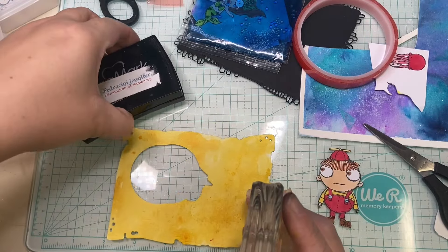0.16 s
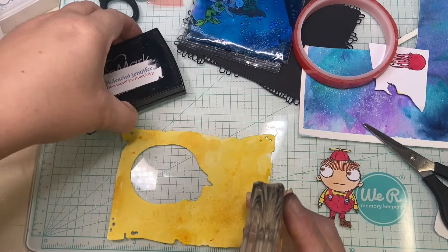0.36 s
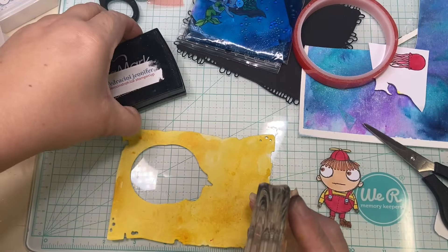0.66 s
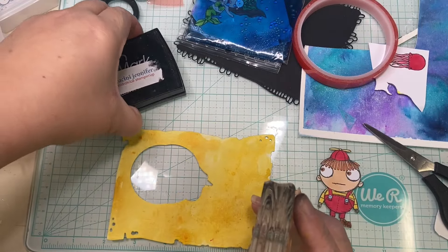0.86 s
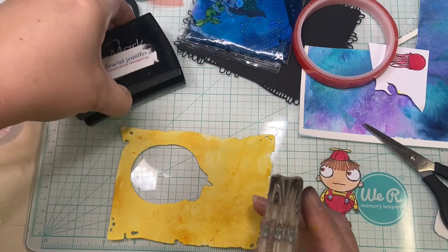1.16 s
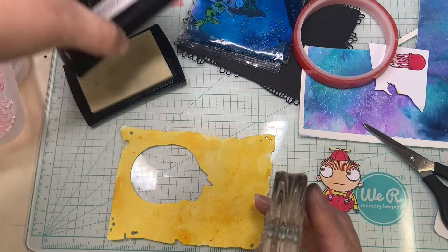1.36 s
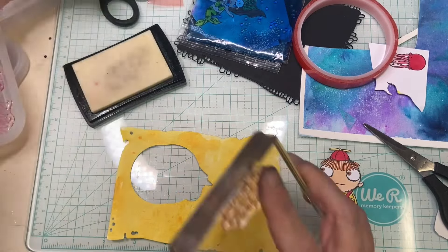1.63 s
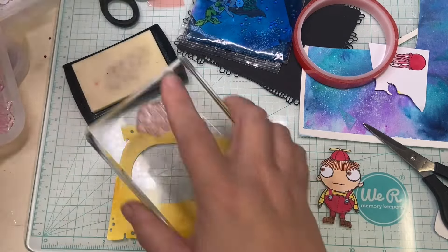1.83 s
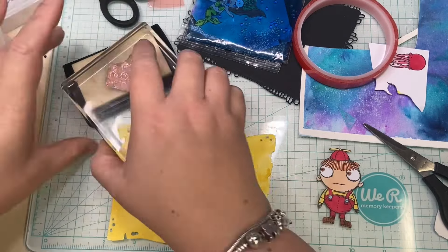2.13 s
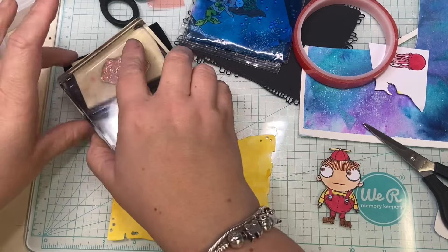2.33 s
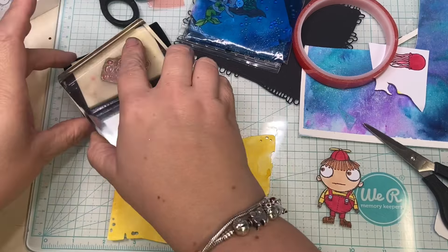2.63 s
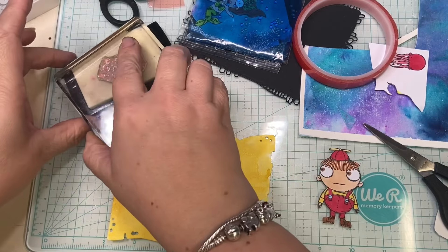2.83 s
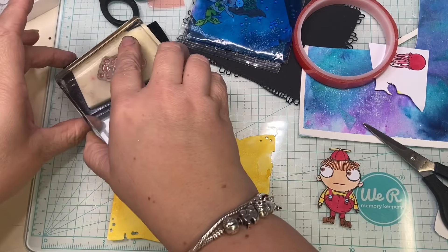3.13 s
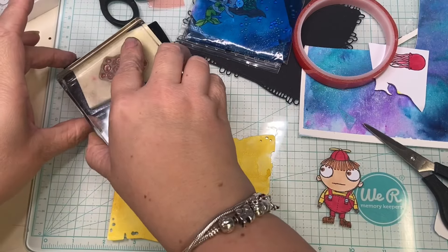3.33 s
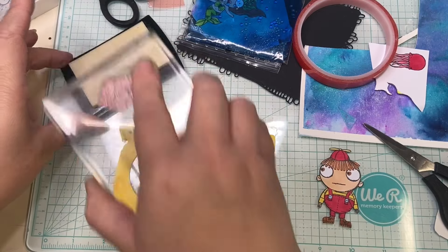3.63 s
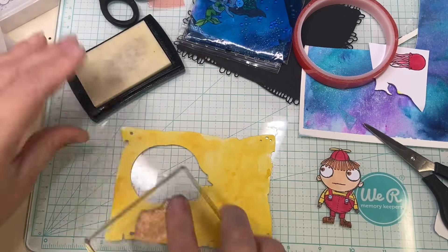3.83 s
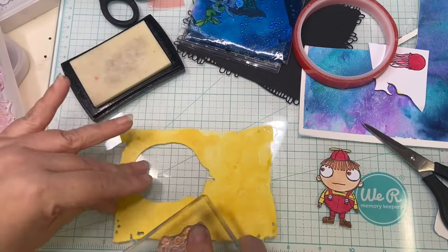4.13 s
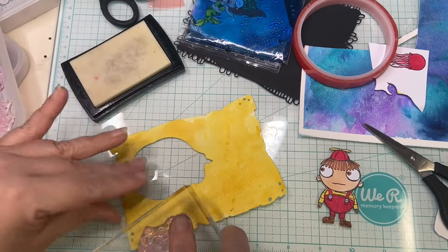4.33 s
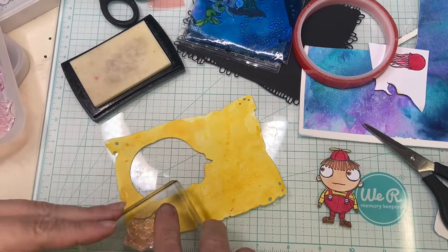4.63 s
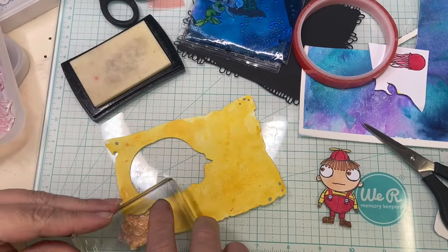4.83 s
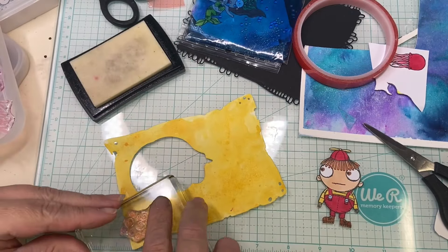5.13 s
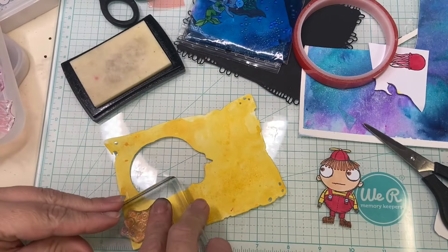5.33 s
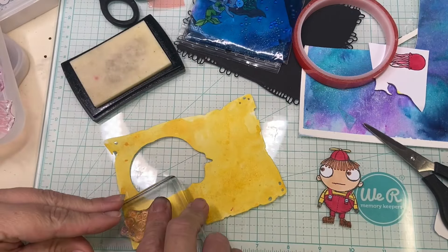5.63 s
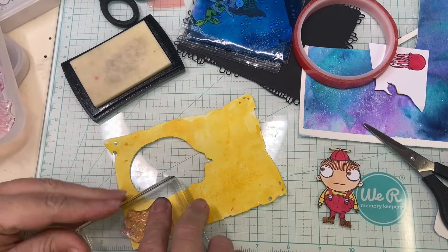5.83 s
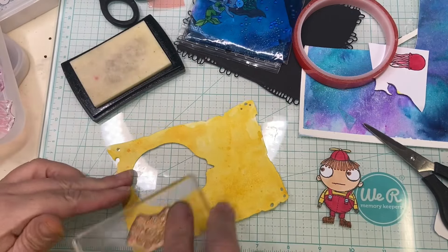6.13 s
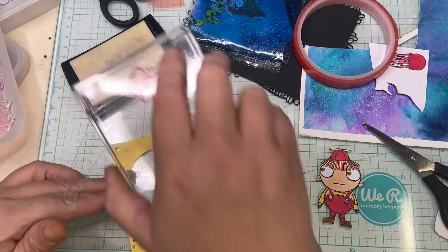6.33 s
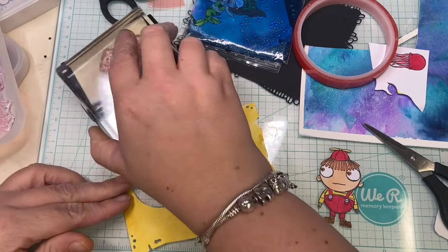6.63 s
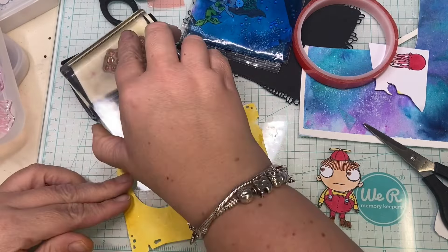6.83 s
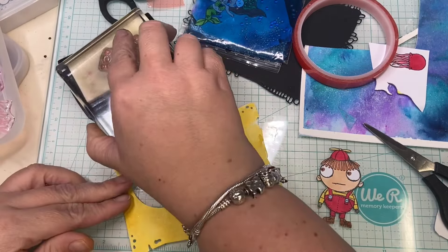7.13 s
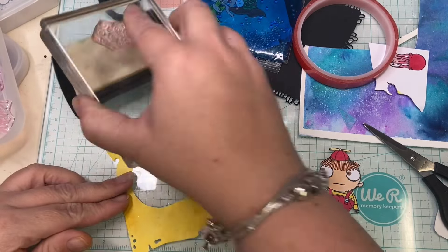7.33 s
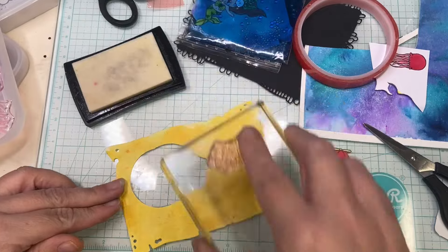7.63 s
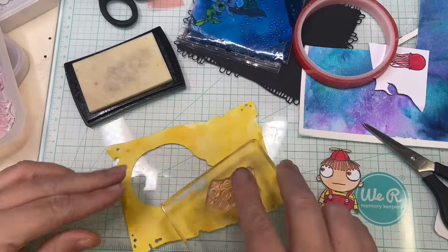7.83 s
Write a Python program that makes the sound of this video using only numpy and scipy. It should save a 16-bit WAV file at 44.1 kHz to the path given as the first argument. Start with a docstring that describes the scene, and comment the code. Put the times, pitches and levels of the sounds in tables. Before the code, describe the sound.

On a craft table in a quiet room, a plastic ink pad lid is pulled off with a few sharp clacks and clatters down. An acrylic stamp block knocks against the pad's case, presses onto card with soft, low thuds and peels away with a sticky snap. More bright clacks follow near the end. Hands and card rustle faintly, close to the microphone, over a soft ventilation hum.

```python
"""A craft table in a quiet room: someone is stamping, close to the microphone.
The lid of an ink pad is pulled off and clatters down; an acrylic block clacks on the pad's plastic case,
is pressed on card and peels off stickily. Each clack layers ringing modes, a noisy crack and a click.
The table top thuds under knocks and hands, skin and card rub in fine grains, and tacky rubber ticks
and rasps. A short room tail surrounds the bright sounds; a soft ventilation hum lies below."""
import sys
import numpy as np
from scipy import signal
from scipy.io import wavfile

SR = 44100
rng = np.random.default_rng(int(sys.argv[2]) if len(sys.argv) > 2 else 0)


def output_pcm(signal):
    """Save a mono or channel-first signal as 16-bit PCM at the path in sys.argv[1].

    Samples are clipped to [-1, 1] before scaling.
    """
    pcm = np.clip(np.atleast_2d(signal).T, -1, 1) * 32767
    wavfile.write(sys.argv[1], SR, np.round(pcm).astype(np.int16))


N = 351918

# block and fingers knock on the pad case; above its hardness a blow loses treble:
# t/s, level/dB, hardness/Hz, place (0 = top, 1 = rim), push into the table/dB relative to level
CASE_KNOCKS = [(0.1105, -28.5, 3160, 0.22, -18), (0.3045, -36.5, 2860, 0.31, -15),
               (1.0385, -25, 940, 0.12, -1.5), (1.1825, -15, 11000, 0.18, -6.5),
               (1.2382, -21, 18000, 0.25, -3.5), (1.2722, -24.5, 10700, 0.19, -10),
               (1.2922, -22, 7600, .2, -11), (2.7042, -24.5, 12000, 0.053, -6),
               (3.5026, -15, 17960, 0.19, -4.5), (3.5135, -25, 13000, 0.25, -3),
               (4.9925, -53, 3500, 0.22, 6), (5.222, -56, 1605, .1, 10.5), (5.9426, -48, 4000, 0.23, 0),
               (6.9416, -46.5, 2420, 0.35, -14), (7.0673, -19.5, 10000, 0.13, -13.5),
               (7.3835, -15, 7900, 0.76, -20), (7.394, -14.5, 11900, 0.72, -17),
               (7.425, -29, 5940, 0.72, -12), (7.441, -27.5, 15000, 0.57, -16),
               (7.447, -25.5, 18000, 0.51, -20)]
# modes of the case: f/Hz, level struck on top/dB, level struck at the rim/dB, t60 before damping/s
CASE_MODES = [(785, -5, -12, .07), (1000, -4, -18, .04), (1132, 2, -14, .06), (1510, 0, -6, .045),
              (1610, 4, -1, .045), (1740, -2, -5, .04), (1860, -3, -3, .045), (2020, -10, -3, .045),
              (2730, -4, -4, .055), (2865, -9, 0, .065), (3160, -7, -6, .06), (3760, -6, -3, .04),
              (3950, 0, 0, .045), (4080, -9, -3, .035), (5200, -7, -5, .04), (5470, -5, -8, .04),
              (8480, -8, -12, .04), (9600, -8, -14, .04), (9950, -7, -11, .04)]
# tone of a perfectly hard blow on the case, a row per band: on top/dB, at the rim/dB
CASE_BAND_GAINS = [(2, -15.5), (0.07, -3.5), (-1.4, 2.5), (-4, -5)]
# the lid lands, bounces and settles: t/s, level/dB, hardness/Hz, place (0 = corner, 1 = flat)
LID_BOUNCES = [(1.639, -46.5, 2100, 0.61), (1.6901, -16, 18000, 0), (1.7048, -23, 6500, 0.17),
               (1.7404, -26, 5200, 0.2), (1.7652, -31, 3000, 0.8), (1.7834, -16, 13000, 1),
               (1.8038, -19, 11000, 0.81), (1.83, -25.5, 5800, 0.78), (1.8639, -25.5, 6200, 1),
               (1.872, -27, 8300, 0.59), (1.904, -30, 5800, 0.65), (1.978, -35.5, 3700, 0.56)]
# modes of the lid: f/Hz, level struck on a corner/dB, level struck flat/dB, t60 before damping/s
LID_MODES = [(790, -11, -12, .09), (1136, -6, -9, .1), (1650, -11, -8, .06), (1990, -5, -7, .06),
             (2450, -8, -11, .07), (2860, -4, -9, .08), (3150, -9, -3, .085), (3377, -9, 0, .1),
             (3735, 4, -10, .06), (3957, -12, -9, .08), (4748, -14, -10, .08), (5047, -16, -4, .085),
             (5232, 0, -14, .065), (5728, -7, -1, .08), (6007, -7, -4, .06), (6245, -8, -4, .07),
             (8533, -14, -9, .06), (9152, -14, -3, .05), (9606, -4, -14, .06), (9980, -5, -15, .06),
             (11400, -5, -16, .05)]
# tone of a perfectly hard blow on the lid, a row per band: on a corner/dB, flat/dB
LID_BAND_GAINS = [(-6.5, -9.5), (-4, -3.5), (4, 4.5), (-2, -1.5)]
# low, middle, high and treble bands of a hit: lower f/Hz, upper f/Hz
TONE_BANDS = [(550, 1300), (1300, 2400), (2400, 6500), (8000, 16000)]
# spectrum of the crowd of short-lived plastic modes: f/Hz, gain/dB
CRACK_EQ = [(100, -18.5), (250, -11.5), (550, -8), (800, -1.5), (1150, -6.5), (1700, 0), (2300, -3),
            (3900, -5), (4600, -6), (5600, -6), (6800, -8.5), (10000, -7.5), (12500, -12), (16000, -17.5)]
# spectrum of a small sharp tick: f/Hz, gain/dB
TICK_EQ = [(300, -35), (1800, -3), (4000, -5.5), (5800, -1.5), (11000, -0.5), (16000, -11)]
# accent ticks of the tacky stamp on pad and card: t/s, peak/dB
STAMP_TICKS = [(2.059, -38), (2.08, -34), (5.127, -50), (5.8633, -30.5), (5.9299, -34), (5.9423, -26),
               (5.9802, -21.5), (5.9842, -15.5), (7.7569, -35.5)]
# light handling ticks: rate/(1/s), least peak above the stroke's level/dB, spread/dB
HANDLING_TICKS = (7, 18.8, 2.2)
# the stamp peels off the card: start/s, end/s, final level/dB
STAMP_PEEL = (5.94, 5.982, -46)
# modes of the table top: f/Hz, relative level/dB, t60/s
TABLE_MODES = [(65.94, 0, 0.16), (89.63, -0.5, 0.056), (118, -2.5, .08), (165, -3, .07), (205, -3.5, 0.12),
               (282, 1, .05), (434, 2.5, 0.12)]
# hands lean on the table or let go of it: t/s, peak/dB
HAND_PRESSES = [(2.266, -37), (5.135, -33), (5.177, -41.5), (5.956, -34.5), (6.667, -32), (6.719, -39)]
# the hands open the pad, ink the block, turn the card and stamp: start/s, length/s, level/dB
HAND_STROKES = [(0.999, .75, -72), (1.949, 0.45, -66), (2.55, .25, -68), (3.03, 0.32, -77),
                (3.399, 0.57, -68.5), (3.948, 0.36, -74.5), (4.299, .38, -75.5), (5.749, 0.96, -71),
                (6.87, 0.22, -73), (7.2, 0.76, -71)]
# the uneven pace of a hand: rate/(1/s), depth/dB
HAND_WAVER = (14, 2)
# spectrum of rubbing skin and card: f/Hz, gain/dB
RUB_EQ = [(300, -16), (2000, -1.5), (5500, 5.5), (8500, -2), (12000, 4.5), (15500, -0.5)]
# ring time of the room: f/Hz, t60/s
ROOM_DECAY = [(150, 0.6), (600, 0.13), (2500, 0.16), (6000, .15), (14000, 0.095)]
# spectrum of the room's hum and hiss: f/Hz, gain/dB
HUM_EQ = [(20, -39.5), (45, -13.5), (67, 5), (88, -5.5), (170, -10), (270, -1), (380, -3.5), (600, -9),
          (900, -19), (2400, -25), (4800, -33.5), (7000, -48), (10000, -49), (16000, -60)]
# resonances and hollows of the room that colour the hum: f/Hz, width/Hz, gain/dB
HUM_BELLS = [(328, 12, -8.5), (360, 19, 3.5), (450, 20, -9.5), (525, 33, 3.5), (657, 11, -8.5),
             (1016, 71, -10), (1070, 58, 8)]
# level curve of the hum: t/s, level/dB
HUM_LEVELS = [(0, -48), (0.699, -49), (3.302, -48.5), (3.8, -51), (5.3, -49.5), (6.9, -49), (7.4, -47),
              (7.55, -50.5), (7.98, -48.5)]
# notches of the microphone port: f/Hz, width/Hz, depth/dB
PORT_NOTCHES = [(7335, 470, 19), (13360, 550, 14.5)]


def case_clacks():
    """Block and fingers strike the pad case; the holding hand keeps its ring short."""
    return plastic_hits(CASE_KNOCKS, CASE_MODES, CASE_BAND_GAINS, ring_share=.4, detune=.012,
                        click_db=-14, click_t60=.0047, punch_db=-2, punch_s=.0038,
                        rise_s=.0015, damping_db_per_s=250)


def lid_clatter():
    """The loose lid bounces on its corners and face, ringing more freely than the case."""
    return plastic_hits(LID_BOUNCES, LID_MODES, LID_BAND_GAINS, ring_share=.45, detune=.005,
                        click_db=-7, click_t60=.012, punch_db=-7.5, punch_s=.003,
                        rise_s=.0027, damping_db_per_s=100)


def plastic_hits(hits, modes, band_gains, ring_share, detune, click_db, click_t60,
                 punch_db, punch_s, rise_s, damping_db_per_s):
    """Each blow rings the plastic; the place and hardness of the contact set its colour."""
    choke_db, choke_s, soft_slope = 9, .006, 3.6
    out, t = np.zeros(N), np.arange(SR // 4) / SR
    gaps = np.diff([hit[0] for hit in hits], append=N / SR)
    centres = np.sqrt(np.prod(TONE_BANDS, axis=1))
    for (start, level_db, hard_hz, place, *_), gap in zip(hits, gaps):
        ring = np.zeros(len(t))
        for (hz, first_db, second_db, t60), (phase, load) in zip(modes, rng.uniform(-1, 1, (len(modes), 2))):
            mode_db = first_db + (second_db - first_db) * place
            # whatever holds the plastic damps each mode and pulls it a little off pitch
            decay = amp(mode_db - (60 / t60 + damping_db_per_s) * t)
            ring += decay * np.sin(2 * np.pi * (hz * (1 + detune * load) * t + phase))
        choke = amp(-choke_db * np.clip((t - gap) / choke_s, 0, 1))  # the next contact damps the ring
        ring = unit_rms(ring) * choke
        crack = unit_rms(eq(burst(t, t60=.046), CRACK_EQ))
        click = unit_rms(eq(burst(t, click_t60), TICK_EQ))  # the hard edges meet
        hit = np.sqrt(ring_share) * ring + np.sqrt(1 - ring_share) * crack + amp(click_db) * click
        hit *= 1 + amp(punch_db) * np.exp(-(t / punch_s) ** 2)  # loudest while the two parts touch
        hit *= 1 - np.exp(-t / rise_s)  # the contact force takes a moment to build
        dulling_db = 10 * np.log10(1 + (centres / hard_hz) ** soft_slope)  # soft contacts last longer
        targets_db = level_db + np.dot(band_gains, [1 - place, place]) - dulling_db
        for _ in range(2):  # the bands overlap, so the tone is set in two passes
            trims_db = targets_db - [attack_db(hit, band) for band in TONE_BANDS]
            hit = eq(hit, list(zip(centres, trims_db)))
        add(out, start, hit)
    return out


def tacky_ticks():
    """Tacky rubber lets go in tiny bright snaps; faint ones fall at random within the hand strokes."""
    out, t = np.zeros(N), np.arange(SR // 10) / SR
    per_s, above_db, spread_db = HANDLING_TICKS
    strays, tries = [], 16
    for start, length, db in HAND_STROKES:
        for when, size, chance in rng.random((tries, 3)):
            if chance < per_s * length / tries:
                strays.append((start + length * when, db + above_db - spread_db * np.log(1 - size)))
    for start, peak_db in STAMP_TICKS + strays:
        tick = eq(burst(t, t60=.022, snap=.41), TICK_EQ)
        add(out, start, amp(peak_db) * tick / abs(tick).max())
    return out


def peel(growth_db):
    """Inky rubber tears free of the card in a rasp that grows until it lets go."""
    start, end, final_db = STAMP_PEEL
    out, size = np.zeros(N), round((end - start) * SR)
    rasp = unit_rms(eq(grains(size), TICK_EQ))
    add(out, start, rasp * amp(final_db + np.linspace(-growth_db, 0, size)))
    return out


def table_thuds(rise_s, lag_s, low_cut_hz, db_per_octave):
    """Knocks and presses swing the table top under the mat; a quicker push favours higher modes."""
    quick_hz, slow_hz, lid_push_db = 97.1, 78.97, -19.5
    out, t = np.zeros(N), np.arange(SR // 2) / SR
    low_cut = signal.butter(5, low_cut_hz, "high", fs=SR, output="sos")
    pushes = ([(start, db + push_db, quick_hz) for start, db, _, _, push_db in CASE_KNOCKS]
              + [(start, db + lid_push_db, slow_hz) for start, db, _, _ in LID_BOUNCES]
              + [(start, db, slow_hz) for start, db in HAND_PRESSES])
    for start, peak_db, push_hz in pushes:
        thud = np.zeros(len(t))
        for hz, db, t60 in TABLE_MODES:
            mode_db = db - db_per_octave * abs(np.log2(hz / push_hz))
            thud += amp(mode_db - 60 * t / t60) * np.sin(2 * np.pi * hz * (t - rise_s))
        thud *= 1 - np.exp(-(t / rise_s) ** 2)
        thud = signal.sosfilt(low_cut, thud)
        add(out, start + lag_s, amp(peak_db) * thud / abs(thud).max())
    return out


def hand_rustle(fade_s):
    """Skin and card rub in fine grains; each stroke swells, wavers with the hand's pace and fades."""
    t = np.arange(N) / SR
    envelope = sum(amp(db) * np.clip(np.minimum(t - start, start + length - t) / fade_s, 0, 1)
                   for start, length, db in HAND_STROKES)
    per_s, depth_db = HAND_WAVER
    pace = np.interp(t * per_s, np.arange(N), rng.standard_normal(N))
    return envelope * amp(depth_db * pace) * unit_rms(eq(grains(N), RUB_EQ))


def room(x, wet_db, build_s):
    """Early echoes from the table and walls merge into a short tail behind the direct sound."""
    hz, t, noise = signal.stft(rng.standard_normal(SR // 2), SR, nperseg=256)
    decay = amp(-60 * t / curve_at(ROOM_DECAY, hz)[:, None])
    tail = signal.istft(noise * decay, SR, nperseg=256)[1]
    tail *= 1 - np.exp(-(np.arange(len(tail)) / SR / build_s) ** 2)
    return x + amp(wet_db) * signal.fftconvolve(x, tail / np.linalg.norm(tail))[:N]


def ventilation_hum(waver_db):
    """A bed of low ventilation noise, coloured by the room and wavering a little."""
    air = colour(rng.standard_normal(N), lambda hz: curve_at(HUM_EQ, hz) + bells(HUM_BELLS, hz), 8192)
    waver = np.interp(np.arange(N), np.linspace(0, N, 60), rng.standard_normal(60))
    level_db = np.interp(np.arange(N) / SR, *np.transpose(HUM_LEVELS))
    return amp(level_db + waver_db * waver) * unit_rms(air)


def burst(t, t60, snap=0):
    """A dense, quickly dying ring of noise; snap adds a sharp first contact."""
    x = rng.standard_normal(len(t)) * amp(-60 * t / t60)
    x /= np.linalg.norm(x)
    x[0] += snap
    return x


def grains(size, per_s=3500, spread_db=3.2):
    """A sparse train of tiny slips of uneven size."""
    sizes = amp(spread_db * np.minimum(rng.exponential(1, size), 4))
    return sizes * rng.standard_normal(size) * (rng.random(size) < per_s / SR)


def attack_db(hit, band_hz, window_s=.009):
    """Level of one band over the first moments of a hit."""
    band_pass = signal.butter(3, band_hz, "band", fs=SR, output="sos")
    attack = signal.sosfilt(band_pass, hit[:round(window_s * SR)])
    return 10 * np.log10(np.mean(attack ** 2) + 1e-20)


def eq(x, points):
    """Shape a sound with an EQ curve of f/Hz, gain/dB points."""
    return colour(x, lambda hz: curve_at(points, hz))


def colour(x, db_at, size=4096):
    """Minimum-phase filter whose gain in dB is db_at(hz)."""
    log_gain = np.log(amp(db_at(abs(np.fft.fftfreq(size, 1 / SR)))))
    taps = np.fft.ifft(np.exp(np.conj(signal.hilbert(log_gain)))).real
    return signal.fftconvolve(x, taps[:size // 2])[:len(x)]


def curve_at(points, hz):
    """Straight lines between the points on a log-frequency axis."""
    f, value = np.transpose(points)
    return np.interp(np.log(hz + 1), np.log(f + 1), value)


def bells(rows, hz):
    """Sum of bell-shaped boosts or cuts, in dB."""
    return sum(db * np.exp(-((hz - f) / width) ** 2) for f, width, db in rows)


def amp(db):
    return 10 ** (np.asarray(db) / 20)


def unit_rms(x):
    return x / np.sqrt(np.mean(x ** 2) + 1e-20)


def add(mix, start_s, sound):
    part = mix[round(start_s * SR):][:len(sound)]
    part += sound[:len(part)]


def scene():
    """Plastic and handling sounds get the room tail; thuds and hum sit dry beneath them."""
    plastic = case_clacks() + lid_clatter()
    thuds = table_thuds(rise_s=.008, lag_s=.009, low_cut_hz=47, db_per_octave=9)
    hum = ventilation_hum(waver_db=1.25)
    handling = hand_rustle(fade_s=.13) + peel(growth_db=5) + tacky_ticks()
    return (room(plastic + handling, wet_db=-11.5, build_s=.004) + thuds + hum)[None]


def record(dry):
    """The microphone port cuts two treble notches; a full-scale clip and a high cut follow."""
    notched = colour(dry[0], lambda hz: -bells(PORT_NOTCHES, hz))
    high_cut = signal.firwin(255, 16400, window=("kaiser", 8), fs=SR)
    return signal.oaconvolve(np.clip(notched, -1, 1), high_cut, "same")[None]


dry = scene()
out = record(dry)
output_pcm(out)
```